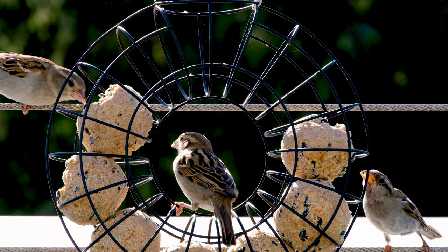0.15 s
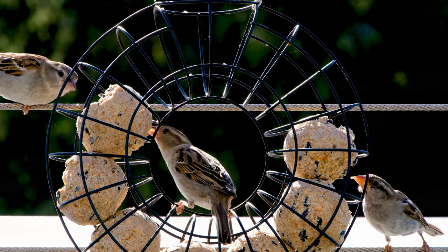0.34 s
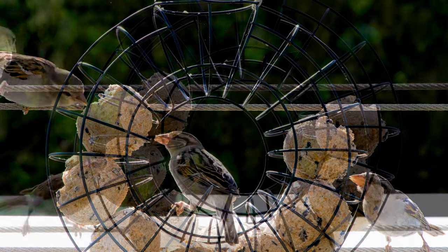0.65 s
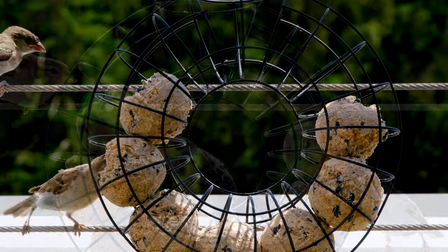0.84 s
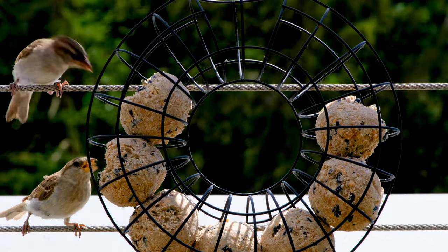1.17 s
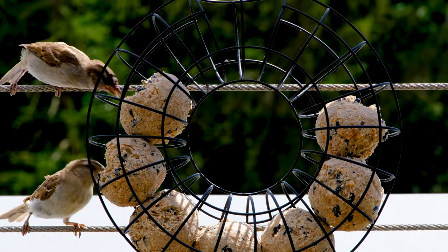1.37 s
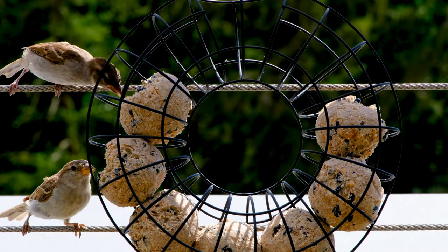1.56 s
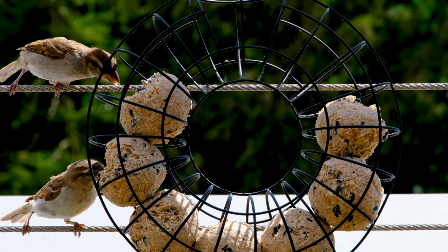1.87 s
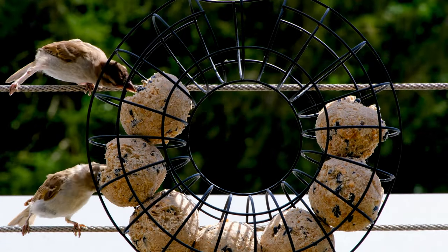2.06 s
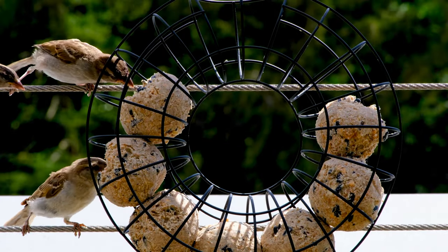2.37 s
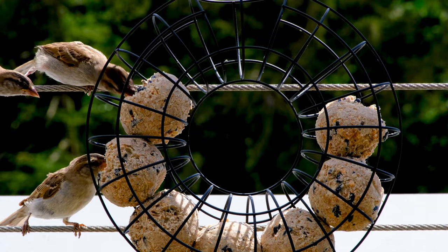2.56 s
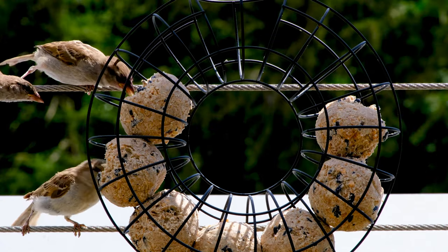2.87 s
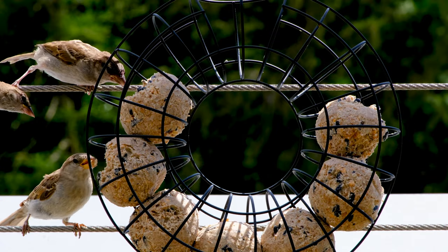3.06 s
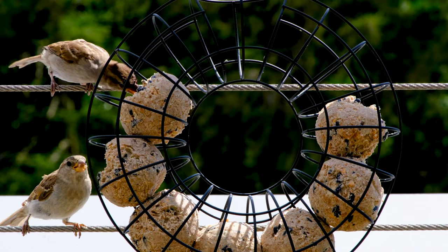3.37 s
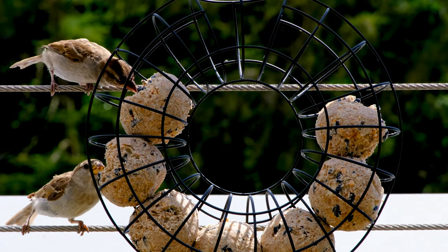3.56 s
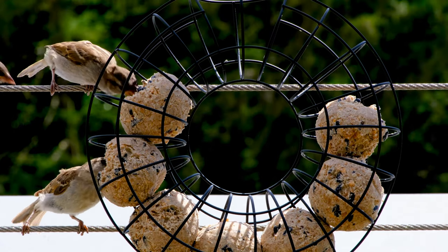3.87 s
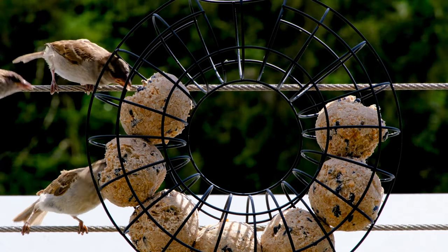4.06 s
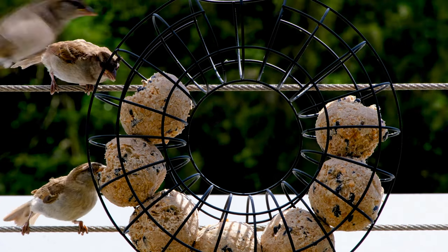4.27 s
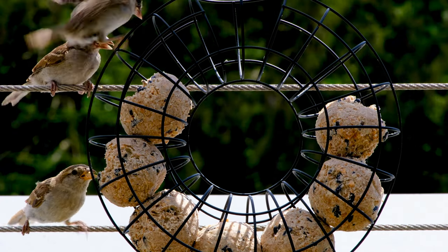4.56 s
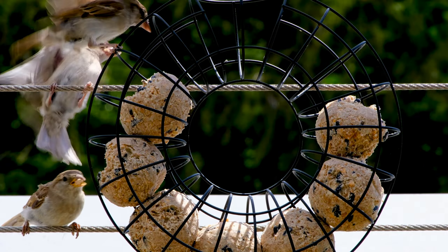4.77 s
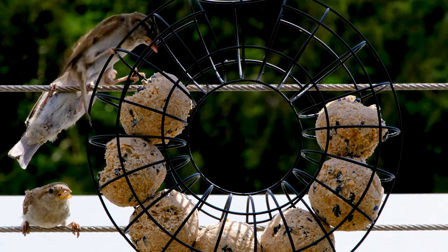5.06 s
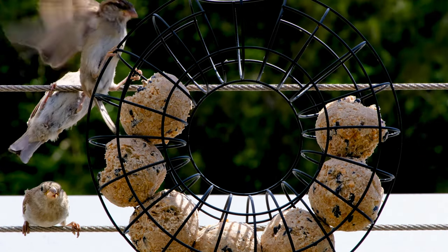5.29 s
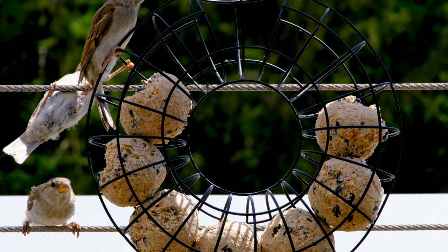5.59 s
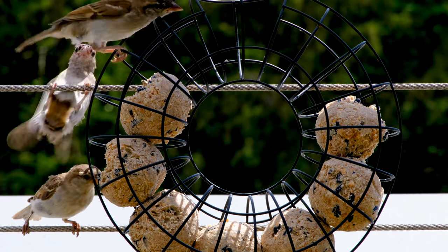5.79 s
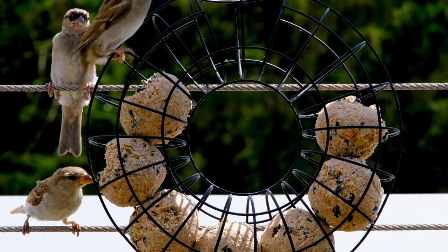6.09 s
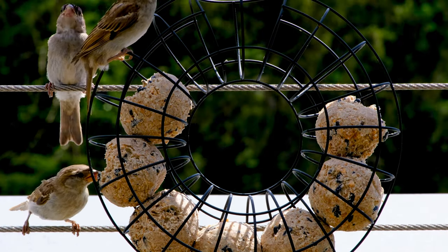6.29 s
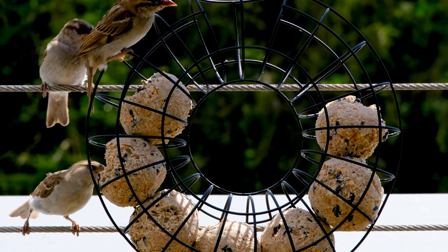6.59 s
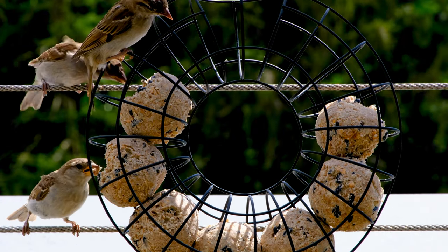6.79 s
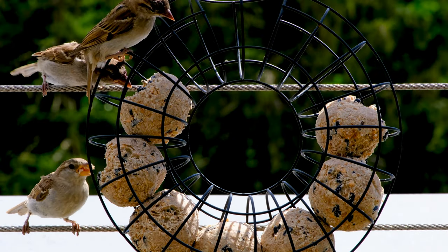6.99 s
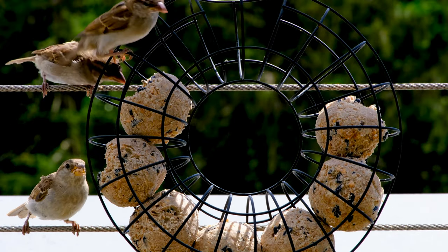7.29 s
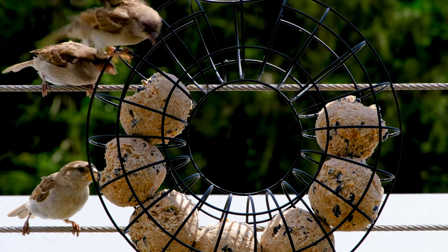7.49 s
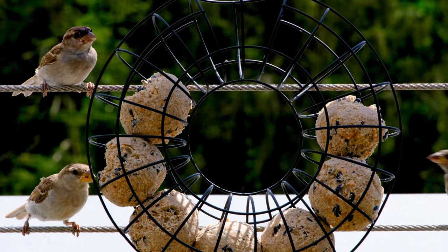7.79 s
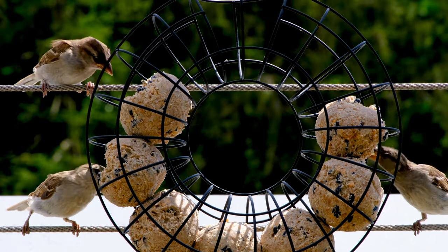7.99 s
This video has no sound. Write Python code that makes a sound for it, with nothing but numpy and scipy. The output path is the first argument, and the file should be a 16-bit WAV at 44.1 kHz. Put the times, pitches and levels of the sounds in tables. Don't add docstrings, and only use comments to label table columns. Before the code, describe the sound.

Small sparrows at a feeder sound slowed down: rounded whistles rising and sinking, with faint overtones, breathy hiss and a reverberant yard echo. A tap and a higher chirp open at 0 s, another follows near 0.4, then a loud lower chirp at 0.6. A thuddy tap lands at 0.9. Softer lower chirps come at 1.3-1.8, higher pairs at 2.2-2.6, lower ones at 3.0-3.3, and an overlapping mix at 4.0-4.4, with a small tap after. Low rumble, traffic, air hiss, insects and far twitter continue; distant coos cluster around 3.5-4.3. Insects thin after 5.3, with a faint higher pair at 5.6-5.9. Lower chirps return at 6.7-6.9 with light leaf steps, a cricket trills and fades from 6.9, a far bird warbles at 7.0-7.7, and chirps at 7.5 and loudly at 7.7 finish, echo fading by 8.

```python
import sys
import numpy as np
from scipy import signal
from scipy.fft import rfft, irfft, next_fast_len
from scipy.io import wavfile
from scipy.ndimage import uniform_filter1d, map_coordinates

SR = 44100
rng = np.random.default_rng(int(sys.argv[2]) if len(sys.argv) > 2 else 0)


def put_to_file(sound):
    columns = np.atleast_2d(sound).T
    safe = np.clip(columns, -1, 1)
    whole_steps = np.round(safe * 32767)
    wavfile.write(sys.argv[1], SR, whole_steps.astype(np.int16))


def gain_from_db(level_db):
    decades = np.asarray(level_db, float) / 20
    return 10 ** decades


N = 358974

# centre in Hz, width in Hz, level in dB.
THROAT = [(1950, 500, -57.5), (2800, 1200, -51.5), (5810, 830, -46), (7189, 810, -49), (9500, 1000, -48.5),
          (10800, 740, -52.5), (11470, 400, -52), (13000, 400, -57.5), (14020, 700, -57.5),
          (15300, 600, -55.5)]
# multiple of the pitch, level in dB.
OVERTONES = [(2, -0.5), (3, -19.5), (4, 7), (5, 3), (6, -17), (7, 0.5), (8, -15.5), (9, 4.5), (10, -11),
             (11, 4), (12, 1), (13, -4.5)]
# time in seconds, low overtones in dB, high overtones in dB.
BEAK_OPENING = [(.1, -0.5, -2.2), (.4, 1.5, 2.5), (.64, 5.5, 2.5), (1.3, -4.5, -3.5), (1.6, 0, -1.5),
                (1.8, 5.5, 3.5), (2.25, -3.5, -5), (2.55, -1, 1), (3.05, 3, -0.5), (3.3, 1, 0.5),
                (4.05, -1, -6.5), (4.25, 3, 1), (4.4, -2, 0), (5.63, 0, 1), (5.95, 1.5, 6),
                (6.7, -11, -9.5), (6.9, -15.5, -6.5), (7.47, 10.5, -1), (7.702, 3.5, -1.5)]
# start in seconds, top pitch in Hz, peak in dB, pitch at the joint in Hz, level at the joint in dB.
OPENINGS = [(-.05, 1180, -15.5, 1203, -17), (0.257, 1380, -23.5, 1219, -23), (.515, 980, -38, 888, -38),
            (1.422, 1232, -25, 1212, -60.5), (1.707, 1200, -31.5, 1055, -33.5),
            (2.165, 1041, -53, 1091, -48), (2.452, 1298, -25.5, 1101, -42), (2.93, 936, -58.5, 837, -47.5),
            (3.192, 1260, -27.5, 1054, -29), (4.148, 1260, -33, 1170, -33.5),
            (4.285, 1304, -32.5, 1134, -43), (5.851, 1246, -32.5, 1187, -42),
            (6.82, 1218, -23.5, 1040, -34), (7.378, 881, -50.5, 836, -42), (6.55, 798, -65.5, 856, -54),
            (7.601, 1220, -25.5, 1090, -35)]
STRUCK_S = np.array([1.71, 2.452, 5.85])

# crest in seconds, crest pitch in Hz,
# peak in dB, downstroke over crest in dB, echo share in dB.
LOW_SHORT = [
    (0.639, 1231, -15.5, -13.5, -15.5),
    (1.295, 1161, -33, -6, -4.5),
    (3.048, 1232, -36.5, 2, 4.5),
]
SHORT_SHAPE = dict(rise_s=0.03, rise_bend=1.3, fall_s=0.07, fall_bend=1.05, rest_hz=786,
                   release_db=18, scoop=0.45, opening_top=0.58, low_db=0, high_db=-2)
LOW_LAZY = [
    (4.009, 1185, -39.5, 6, 0.5),
    (6.672, 1224, -34, 5, 1),
    (7.475, 1082, -36, 4.5, -3),
]
LAZY_SHAPE = dict(rise_s=0.039, rise_bend=0.86, fall_s=0.068, fall_bend=0.954, rest_hz=804,
                  release_db=11.5, scoop=0.52, opening_top=0.37, low_db=-2, high_db=-2)
LOW_LONG = [
    (1.547, 1292, -27.5, -6, -2),
    (1.814, 1266, -31.5, -5.5, -4),
    (3.305, 1288, -26, -5, -3.5),
    (4.256, 1325, -28, -5.5, 1.5),
    (6.925, 1234, -21, -9.5, -7),
    (7.719, 1288, -16, -10.5, -10),
]
LONG_SHAPE = dict(rise_s=0.033, rise_bend=1.2, fall_s=0.068, fall_bend=1.4, rest_hz=853.7,
                  release_db=5, scoop=0.52, opening_top=0.54, low_db=8, high_db=0)
HIGH_NEAR = [
    (.05, 1470, -24, 3.5, -8.5),
    (.362, 1507, -27, 7, -9),
]
NEAR_SHAPE = dict(rise_s=0.042, rise_bend=1.4, fall_s=0.08, fall_bend=1.4, rest_hz=742,
                  release_db=33, scoop=0.23, opening_top=0.49, low_db=13.5, high_db=4.5)
HIGH_BIRD = [
    (2.24, 1368, -32.5, -5, 0.5),
    (2.551, 1442, -27, 0, -5),
    (4.093, 1360, -34, -1, 4),
    (4.4, 1450, -32, 3.1, -1),
    (5.63, 1358, -39, -3.5, 3.5),
    (5.941, 1415, -32.5, -1.5, 0),
]
HIGH_SHAPE = dict(rise_s=0.049, rise_bend=1.3, fall_s=0.07, fall_bend=1.7, rest_hz=858,
                  release_db=15, scoop=0.23, opening_top=0.33, low_db=8, high_db=4)
# start in seconds, length in seconds, pitch in Hz, peak in dB.
ANSWERS = [
    (1.84, 0.044, 1222, -33.5),
    (2.289, 0.031, 1369, -36),
    (5.697, 0.086, 1343, -37.5),
]
ANSWER_STANCE = (-6, -1, -1.6)
ANSWER_HIGH_HZ, ANSWER_DROOP_HZ = 1300, 43.95

# frequency in Hz, level in dB per Hz.
LOW_BREATH = [(9900, -43), (10400, -1), (10850, 1.5), (11300, -19.5), (13100, -29.5), (13600, -5.5),
              (14150, -5.5), (14700, -34)]
# frequency in Hz, level in dB per Hz.
HIGH_BREATH = [(7500, -59), (9000, -4.5), (10500, -0.5), (11800, -7.5), (12800, -14), (13800, -9),
               (15200, -3), (15700, 1.5)]
# frequency in Hz, seconds to fade by 60 dB.
YARD = [(700, 0.19), (1100, 0.48), (1450, 0.67), (3000, 0.039), (8000, 0.78), (15000, 0.17)]
# delay in seconds, level in dB.
WALLS = [(0.01, -11), (0.021, -6), (0.046, -9), (0.083, -18.5), (0.129, -13.5)]
# frequency in Hz, seconds to fade by 60 dB.
FAR_YARD = [(500, .3), (1500, .35), (2600, .45), (3500, .4)]

# frequency in Hz, level in dB per Hz.
HISS = [(500, -120), (1150, 7), (1700, -11.5), (3000, -14), (4100, -12), (4450, -9.5), (4800, -7),
        (6000, -10), (6400, -5), (6800, -15.5), (8800, -8), (9400, -19.5), (10500, -21), (12500, -28),
        (13500, -37.5), (15600, -46)]
# time in seconds, change of the hiss in dB.
HISS_SWELL = [(0, 2.5), (1.2, 0), (2.6, 0.5), (3.7, -0.5), (4.4, 1.5), (5.2, -1.5), (5.5, 0), (6, -0.5),
              (6.5, -0.5), (7.2, 1), (8.1, 2)]
# time in seconds, traffic in dB, bustle in the hedge in dB.
AIR = [(.06, -59, -63.5), (.88, -59.5, -64.5), (1.11, -63.5, -77.5), (1.67, -60.5, -68), (2.69, -60, -61.5),
       (3.18, -60.5, -66.5), (3.75, -61, -81), (4.04, -54.5, -71), (4.19, -59, -63.5), (4.57, -56.5, -64.5),
       (4.8, -62.5, -78), (4.95, -63.5, -83), (5.2, -65, -97), (5.45, -85, -86), (5.6, -67.5, -80),
       (5.84, -60.5, -85), (6.45, -61, -93.5), (6.95, -58.5, -70.5), (7.2, -59, -88.5), (8.08, -63, -87.5)]
# frequency in Hz, level in dB per Hz.
RUMBLE = [(12, -37.5), (20, -11.5), (27, -17.5), (71, -9.5), (98, -15.5), (145, -15.5), (183, -18.5),
          (274, -23.5), (385, -33), (450, -37.5), (580, -55.5), (990, -120)]
# frequency in Hz, level in dB per Hz.
TRAFFIC = [(100, -120), (200, -11.5), (330, 2.5), (600, 0.5), (850, -6), (1100, -35), (1500, -21),
           (2000, -34), (3000, -120)]
# frequency in Hz, level in dB per Hz.
LEAVES = [(600, -120), (1000, -22.5), (1500, -1), (1950, -4.5), (2200, -23.5), (2500, -37.5), (3500, -120)]
# frequency in Hz, level in dB per Hz.
TWITTER = [(1500, -120), (2200, -7.5), (2480, 7.5), (2680, -10), (2840, 4), (2990, -15), (3180, -5),
           (3320, -16.5), (3450, -10.5), (3650, -24), (4200, -26.5), (5500, -120)]
# start in seconds, hold in seconds, level in dB.
TWITTER_BOUTS = [
    (0, 0.87, -74),
    (1.42, 0.77, -77),
    (2.2, 1, -70.5),
    (3.25, 1, -76.5),
    (4.12, 0.14, -69.5),
    (4.58, 0.52, -81.5),
    (6.65, 0.39, -79),
    (7.05, 0.56, -89),
    (7.9, 0.49, -89.5),
]
# start in seconds, hold in seconds, level in dB.
HIGH_BURSTS = [
    (0, 1.08, -75.5),
    (2.495, 0.34, -77.5),
    (4.2, 0.3, -82.5),
    (5.8, 0.33, -78.5),
    (6.2, 0.29, -78.5),
    (6.724, 0.46, -73.5),
    (7.3, 0.5, -76),
]

# time in seconds, peak in dB, thud in dB.
TICKS = [
    (0.0253, -21, 14.5),
    (0.857, -34.5, 21),
    (1.699, -56, -1),
    (4.4646, -43, -4),
    (4.7197, -71, -4),
    (6.692, -46, -6),
    (6.9703, -58.5, 2),
]
# start in seconds, hold in seconds, level in dB.
RUSTLES = [
    (6.692, 0.054, -57),
    (6.745, .05, -60),
    (7.1, .11, -65),
    (5.2, 0.017, -73),
]

# start in seconds, length in seconds, first Hz, last Hz, peak in dB.
COOS = [(.03, .1, 499, 517, -45.5), (.145, .06, 497.5, 493, -51), (2.65, 0.089, 497, 486, -53.5),
        (3.522, .11, 608, 572, -52.5), (3.71, 0.45, 330, 296.6, -52.5), (3.737, 0.13, 642, 697, -55.5),
        (3.971, 0.21, 613, 623, -46), (4.122, 0.066, 641, 618, -50), (4.199, 0.19, 605, 590, -54),
        (3.916, 0.089, 880, 886, -58), (6.247, 0.1, 750, 790, -58), (6.37, .06, 770, 750, -58),
        (6.27, 0.12, 570, 610, -56), (6.42, .07, 610, 570, -53), (6.49, .09, 571, 790, -57),
        (6.31, 0.15, 1350, 1800, -78), (6.53, .12, 1200, 1400, -72), (4.708, .022, 1600, 1430, -59),
        (.21, .065, 500, 500, -52), (.31, .03, 500, 500, -54), (.365, .085, 500, 500, -55),
        (7.75, .15, 1900, 1900, -68), (2.115, .055, 720, 780, -55)]
# start in seconds, length in seconds, first Hz, last Hz, peak in dB.
TWEETS = [(2.033, 0.057, 1795, 1810, -56.5), (2.302, 0.065, 2670, 2234, -54.5),
          (2.457, 0.04, 2640, 2540, -51.5), (2.582, 0.094, 2097, 2094, -60),
          (2.618, 0.052, 2720, 2586, -53), (2.748, 0.038, 2445, 2690, -54), (2.76, 0.057, 3260, 3180, -67),
          (2.901, 0.054, 2440, 2674, -55), (4.637, 0.018, 2870, 2770, -63), (5.122, 0.015, 2900, 2680, -62),
          (5.749, 0.037, 2880, 2837, -71), (6.777, 0.19, 2340, 2465, -71.5), (4.16, 0.026, 3290, 3170, -65),
          (4.165, .03, 2490, 2380, -67), (4.382, 0.049, 3480, 3300, -73), (4.39, 0.028, 2740, 2920, -65),
          (4.609, 0.035, 3430, 3400, -69.5), (4.648, 0.026, 3280, 3170, -75),
          (4.88, 0.029, 3460, 3200, -71), (4.887, 0.025, 2820, 2780, -65.5),
          (4.933, 0.0455, 2530, 2470, -72), (4.926, 0.047, 4180, 4150, -81.5),
          (2.347, 0.037, 2980, 2800, -65), (2.53, 0.053, 2750, 2915, -66),
          (2.473, 0.047, 3190, 3080, -69.5), (2.92, 0.04, 3160, 3150, -71),
          (7.703, 0.061, 2490, 2610, -71.5), (7.86, 0.036, 3180, 3110, -72), (7.907, 0.1, 3224, 3170, -86),
          (7.979, 0.071, 2610, 2440, -68)]
# time in seconds, pitch in Hz, level in dB.
WARBLE = [
    [(7.0, 2560, -76), (7.06, 2620, -61), (7.1, 2600, -62), (7.15, 2690, -63), (7.205, 2640, -65),
     (7.25, 2930, -64), (7.29, 2580, -65), (7.31, 2520, -74)],
    [(7.325, 2580, -66), (7.362, 3050, -68), (7.379, 3900, -81), (7.395, 2880, -64), (7.43, 2540, -68),
     (7.48, 2520, -71), (7.52, 3020, -69), (7.58, 3170, -73), (7.69, 3120, -72)],
]


def unit(x):
    return x / np.sqrt(np.mean(x ** 2) + 1e-20)


def along(points, hz):
    f, v = np.transpose(points)
    return np.interp(np.log(hz + 1), np.log(f + 1), v)


def curves(rows):
    s, *cols = np.transpose(rows)
    return [np.interp(np.arange(N) / SR, s, c) for c in cols]


def wobble(rate):
    knots = rng.standard_normal(int(N * rate / SR) + 4)
    return map_coordinates(knots, [np.arange(N) * rate / SR])


def rush(gain, patchy_db):
    z = signal.stft(rng.standard_normal(N + 512), nperseg=512)[2]
    field = uniform_filter1d(rng.standard_normal(z.shape), 2, 0)
    field = uniform_filter1d(field, 24, 1)
    x = signal.istft(z * gain_from_db(patchy_db * unit(field)), nperseg=512)[1]
    m = next_fast_len(len(x))
    coloured = rfft(x, m) * gain(np.fft.rfftfreq(m, 1 / SR))
    return unit(irfft(coloured, m)[:N])


def hump(hz, centre_hz, width_hz):
    return 1 / (1 + (2 * (hz - centre_hz) / width_hz) ** 4)


def bouts(rows, rise_db_per_s, fall_db_per_s):
    t = np.arange(N) / SR
    levels = []
    for s, hold, db in rows:
        drop = np.maximum(rise_db_per_s * (s - t), fall_db_per_s * (t - s - hold))
        levels.append(db - drop.clip(0))
    return np.max(levels, axis=0)


def whistle(rows, edge):
    s, hz, db = np.transpose(rows)
    t = np.arange(max(s[0], 0), s[-1], 1 / SR)
    pitch = uniform_filter1d(np.interp(t, s, hz), int(0.01 * SR), mode="nearest")
    fade = np.clip(np.minimum(t - s[0], s[-1] - t) / edge, 0, 1)
    smooth_db = uniform_filter1d(np.interp(t, s, db), int(0.0041 * SR), mode="nearest")
    level = gain_from_db(smooth_db) * np.sin(np.pi / 2 * fade) ** 2
    phase = 2 * np.pi * (np.cumsum(pitch) / SR + rng.random())
    return max(round(s[0] * SR), 0), pitch, phase, level


def add(track, start, x):
    track[start:start + len(x)] += x[:len(track) - start]


def yard(decay, walls):
    hz, t, z = signal.stft(rng.standard_normal(SR * 3 // 4), SR, nperseg=256)
    fading = gain_from_db(-60 * t / along(decay, hz)[:, None]) * (1 - np.exp(-t / 0.015))
    tail = signal.istft(z * fading, SR, nperseg=256)[1]
    slaps = np.zeros(len(tail))
    for s, db in walls:
        slaps[int(s * rng.uniform(0.85, 1.15) * SR)] += gain_from_db(db + rng.normal(0, 1.3))
    dull_slaps = signal.lfilter(*signal.butter(2, 7000, fs=SR), slaps)
    echo = tail / np.linalg.norm(tail) + dull_slaps
    return echo / np.linalg.norm(echo)


def chirp(crest_s, crest_hz, db, after_db, rise_s, rise_bend, fall_s, fall_bend, rest_hz,
          release_db, scoop, opening_top):
    rows, joint_s, u = [], crest_s - rise_s, np.linspace(0, 1, num=11)
    rise_hz, depth_db = 355, 33.5
    for s, top_hz, held_db, joint_hz, joint_db in OPENINGS:
        if 0.07 < crest_s - s < 0.16:
            scooped = np.abs(STRUCK_S - s).min() > 0.01
            low_hz = scoop * (top_hz - rest_hz) * scooped
            part = np.sort([0, opening_top / 2, opening_top, 0.31])
            bends_hz = [top_hz - low_hz, top_hz - 0.22 * low_hz, top_hz, joint_hz]
            hz = np.interp(part, [0, opening_top / 2, opening_top, 1], bends_hz)
            rows = [(s + p * (joint_s - s), f, held_db) for p, f in zip(part, hz)]
            rise_hz, depth_db = crest_hz - joint_hz, db - joint_db
    back = u[:0:-1]
    up = zip(crest_s - rise_s * back, crest_hz - rise_hz * back ** rise_bend, db - depth_db * back ** 2.3)
    fade_db = after_db * np.sin(np.pi / 2 * np.minimum(u / 0.5, 1)) ** 2
    fade_db = fade_db - release_db * np.maximum(u - 0.46, 0) * 2
    fall_hz = crest_hz - (crest_hz - rest_hz) * u ** fall_bend
    return rows + list(up) + list(zip(crest_s + fall_s * u, fall_hz, db + fade_db))


def calls():
    s, low_db, high_db = np.transpose(BEAK_OPENING)
    low_bird = [(0, LOW_SHORT, SHORT_SHAPE), (0, LOW_LAZY, LAZY_SHAPE), (0, LOW_LONG, LONG_SHAPE)]
    high_bird = [(1, HIGH_NEAR, NEAR_SHAPE), (1, HIGH_BIRD, HIGH_SHAPE)]
    for bird, table, shape in low_bird + high_bird:
        form = {k: v for k, v in shape.items() if k not in ("low_db", "high_db")}
        for *arch, echo_db in table:
            low = echo_db + np.interp(arch[0], s, low_db) + shape["low_db"]
            high = echo_db + np.interp(arch[0], s, high_db) + shape["high_db"]
            yield bird, chirp(*arch, **form), (echo_db, low, high)
    for start, length, hz, db in ANSWERS:
        end_hz = hz - ANSWER_DROOP_HZ
        rows = [(start, end_hz, db), (start + length / 2, hz, db), (start + length, end_hz, db)]
        yield int(hz > ANSWER_HIGH_HZ), rows, ANSWER_STANCE


def breath(blowing, colour, db, linger_s):
    t = np.arange(SR // 4) / SR
    linger = unit(gain_from_db(-120 * t / linger_s) * (1 - np.exp(-t / 0.02))) / 60
    power = signal.fftconvolve(blowing ** 2, linger)[:N]
    hiss = rush(lambda hz: gain_from_db(along(colour, hz)) * (hz > 7000), patchy_db=7.5)
    return gain_from_db(db) * np.sqrt(np.abs(power)) * hiss


def sparrows():
    out, blowing = np.zeros(N), np.zeros((2, N))
    order, order_db = np.transpose(OVERTONES)[..., None]
    for bird, rows, (echo_db, low_db, high_db) in calls():
        start, pitch, phase, level = whistle(rows, edge=0.01)
        throat = sum(gain_from_db(db) * hump(order * pitch, hz, width) for hz, width, db in THROAT)
        uneven_db = 2.5 * rng.standard_normal(order.shape)
        strength = gain_from_db(order_db + uneven_db + np.where(order > 6.5, high_db, low_db))
        effort = (level / level.max()) ** 0.5
        overtones = effort * level * np.sum(strength * throat * np.sin(order * phase), axis=0)
        tone = level * np.sin(phase)
        add(out, start, (pitch / 1300) ** 0.8 * tone + overtones)
        beam = (pitch / 1300) ** 1.5 * np.clip(np.arange(len(tone)) / (0.0061 * SR), 0, 1) ** 2
        to_walls = beam * (gain_from_db(echo_db) * tone + gain_from_db(1.5) * overtones)
        add(out, start, signal.fftconvolve(to_walls, yard(YARD, WALLS)))
        add(blowing[bird], start, gain_from_db(high_db) * effort * level)
    out += breath(blowing[0], LOW_BREATH, db=-65, linger_s=0.24)
    return out + breath(blowing[1], HIGH_BREATH, db=-58, linger_s=0.25)


def breeze():
    return gain_from_db(-76 + curves(HISS_SWELL)[0]) * rush(lambda hz: gain_from_db(along(HISS, hz)), patchy_db=2.5)


def machine_hum():
    return gain_from_db(-61) * rush(lambda hz: hump(hz, centre_hz=75, width_hz=5.3), patchy_db=-2.9)


def swelling(db, colour, swell_db, patchy_db):
    swell = gain_from_db(db + swell_db * wobble(7.4))
    return swell * rush(lambda hz: gain_from_db(along(colour, hz)) * (hz > 15), patchy_db)


def surroundings():
    traffic_db, bustle_db = curves(AIR)
    twitter_db = bouts(TWITTER_BOUTS, rise_db_per_s=69.5, fall_db_per_s=38.5)
    out = swelling(-48.5, RUMBLE, swell_db=0.8, patchy_db=0.99)
    out += swelling(traffic_db, TRAFFIC, swell_db=1.2, patchy_db=2.8)
    out += swelling(bustle_db, LEAVES, swell_db=1.5, patchy_db=3)
    return out + swelling(twitter_db, TWITTER, swell_db=2.5, patchy_db=4)


def strokes(rate_hz, drift, knots_per_s=7.1):
    return np.cumsum(rate_hz * (1 + drift * wobble(knots_per_s))) / SR


def insect_chorus():
    t = np.arange(N) / SR
    waking_db = -6.5 * np.exp(-t / 1)
    hush_db = -17 * np.clip((t - 5.31) / 0.2, 0, 1)
    change_db = waking_db + hush_db + 1.6 * wobble(1.7)
    throb = 1 + 0.31 * np.sin(2 * np.pi * strokes(65, 0.31))
    low = unit(throb * rush(lambda hz: hump(hz, 5846, 550), patchy_db=2.0))
    high_db = bouts(HIGH_BURSTS, rise_db_per_s=120, fall_db_per_s=69.5) + 1.3 * wobble(2.5)
    high = rush(lambda hz: hump(hz, 9050, 330), patchy_db=2.5)
    thin = rush(lambda hz: hump(hz, 4450, 160) + 0.8 * hump(hz, 5100, 130) + 0.6 * hump(hz, 4750, 110),
                patchy_db=3.5)
    return gain_from_db(-66.5 + change_db) * low + gain_from_db(high_db) * high + gain_from_db(-82.0 + 0.26 * change_db) * thin


def ticks():
    out, t = np.zeros(N), np.arange(SR // 20) / SR
    for s, db, thud_db in TICKS:
        ringing = sum(np.sin(2 * np.pi * hz * t) for hz in (1620, 1850, 2080))
        snap = ringing * gain_from_db(db - 6.0 - 60 * t / 0.018)
        thud = np.sin(2 * np.pi * 620 * t) * gain_from_db(db + 9.5 + thud_db - 60 * t / 0.0026)
        dull_noise = signal.lfilter(*signal.butter(3, 3500, fs=SR), rng.standard_normal(len(t)))
        crack = gain_from_db(db + 1.5 - 60 * t / 0.006) * dull_noise
        hit = (snap + thud + crack) * (1 - np.exp(-t / 0.001)) ** 3
        add(out, round(s * SR), hit)
        add(out, round(s * SR), gain_from_db(-10.0) * signal.fftconvolve(hit, yard(YARD, WALLS)))
    return out


def far_birds():
    out, songs = np.zeros(N), []
    for s, length, first_hz, last_hz, db in COOS + TWEETS:
        songs.append(([(s, first_hz, db), (s + length, last_hz, db - 2)], 1))
    songs += [(phrase, 0.62) for phrase in WARBLE]
    for rows, haze in songs:
        start, pitch, phase, level = whistle(rows, edge=0.0067)
        n = len(level)
        flutter = gain_from_db(3 * wobble(50)[:n])
        blur = haze * (pitch / 1000) ** 0.7 * 0.6
        direct = flutter * level * np.sin(phase + blur * wobble(80)[:n])
        add(out, start, direct / (1 + (pitch / 4000) ** 2))
        scattered = level * np.sin(phase + blur * wobble(250)[:n]) * (pitch / 1000) ** 0.8
        add(out, start, haze * gain_from_db(-8.5) * signal.fftconvolve(scattered, yard(FAR_YARD, walls=[])))
    return out


def rustles():
    level = gain_from_db(bouts(RUSTLES, rise_db_per_s=899.0, fall_db_per_s=247))
    return level * rush(lambda hz: gain_from_db(along(LEAVES, hz)), patchy_db=-3.5)


def cricket():
    t, start_s = np.arange(N) / SR, 6.89
    pulses = np.sin(np.pi * strokes(76.4, 0.012)) ** 3
    song = np.abs(pulses) * np.sin(2 * np.pi * strokes(6255, 0.0022) + 1.1 * wobble(60))
    catches = sum(np.exp(-((t - 7.008 - k * 0.15) / 0.014) ** 2) for k in range(3))
    trill_db = -58 - 8.5 * (t - start_s) - 13 * catches
    rise = np.clip((t - start_s) / 0.26, 0, 1)
    return gain_from_db(trill_db + 1.3 * wobble(40)) * unit(song) * rise


def scene():
    air = breeze() + machine_hum() + surroundings() + insect_chorus()
    return (sparrows() + air + ticks() + far_birds() + rustles() + cricket())[None]


def low_pass(x):
    return signal.sosfilt(signal.butter(12, 15710, fs=SR, output="sos"), x)


def record(dry):
    offset = 0.0258
    return low_pass(dry + offset)


dry = scene()
out = record(dry)
put_to_file(out)
```